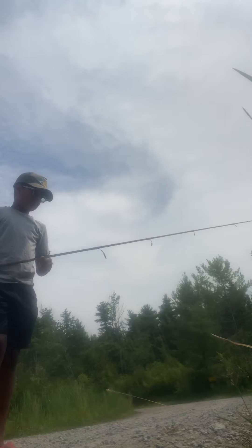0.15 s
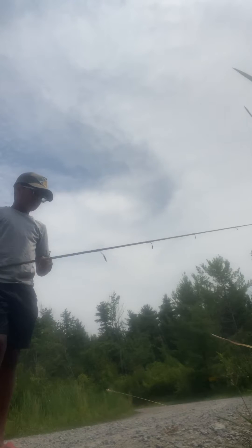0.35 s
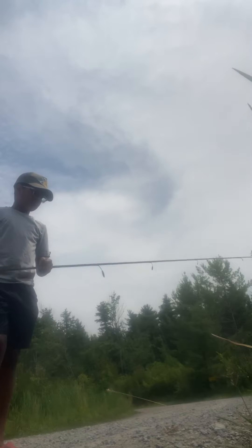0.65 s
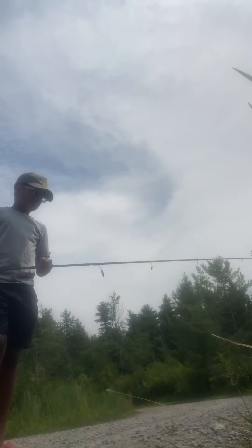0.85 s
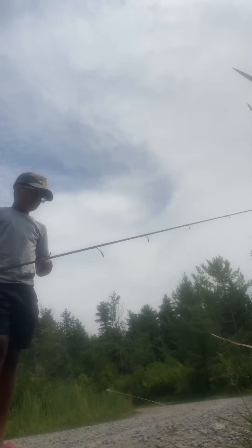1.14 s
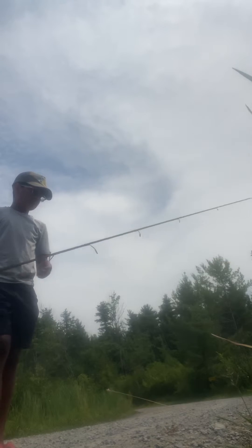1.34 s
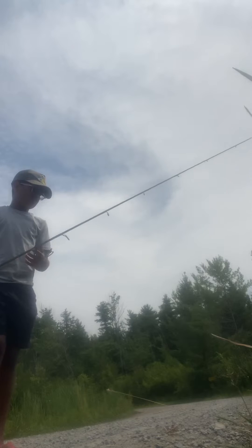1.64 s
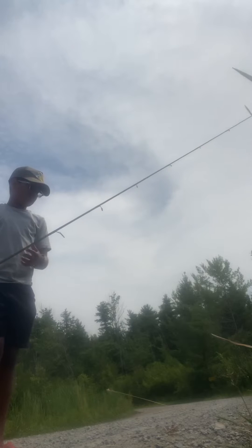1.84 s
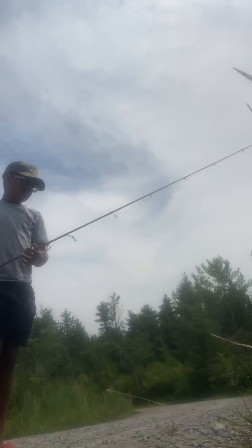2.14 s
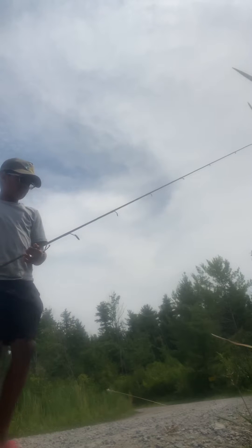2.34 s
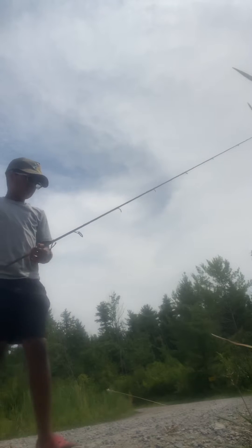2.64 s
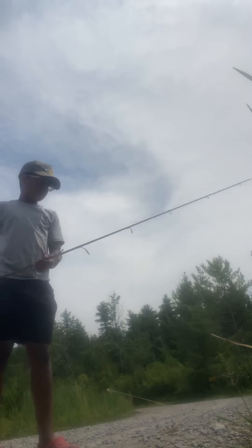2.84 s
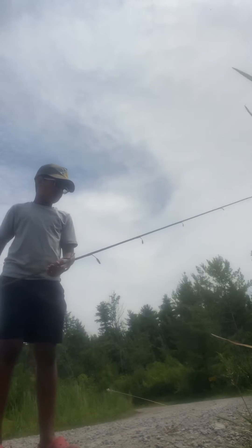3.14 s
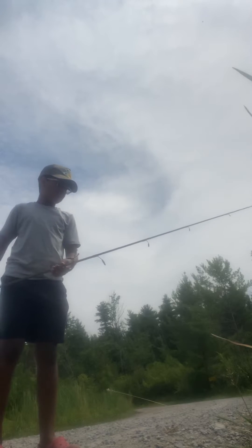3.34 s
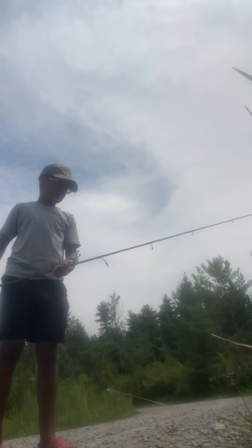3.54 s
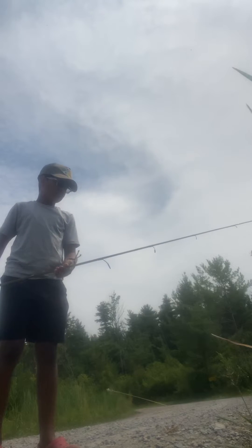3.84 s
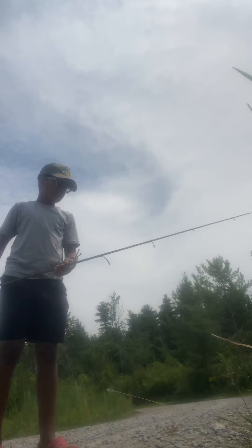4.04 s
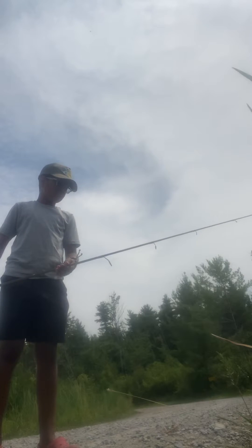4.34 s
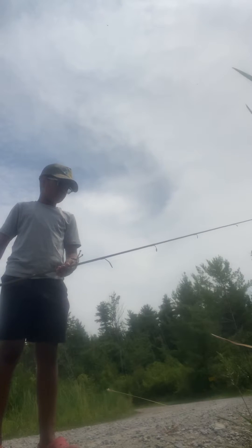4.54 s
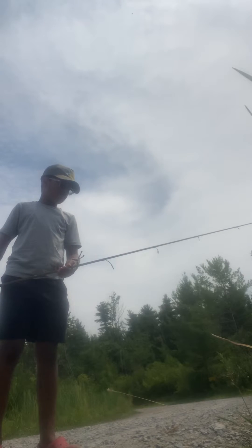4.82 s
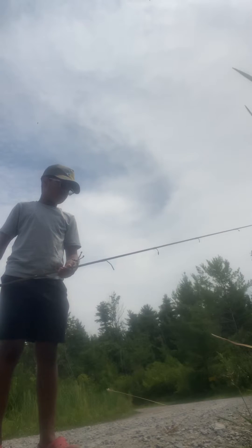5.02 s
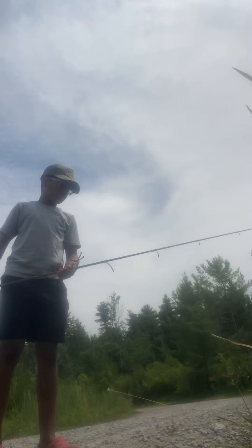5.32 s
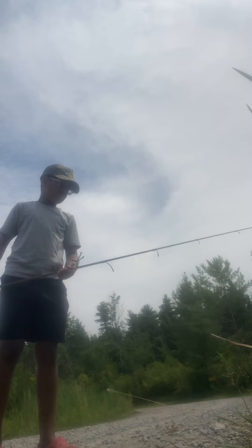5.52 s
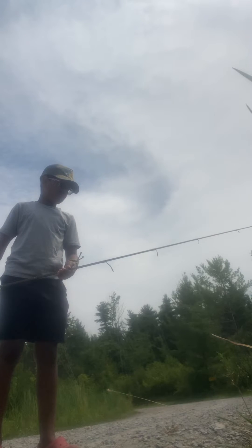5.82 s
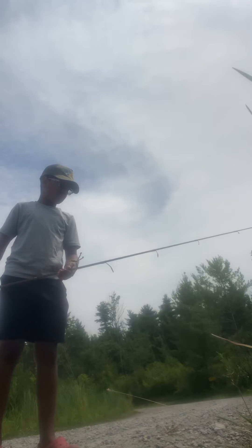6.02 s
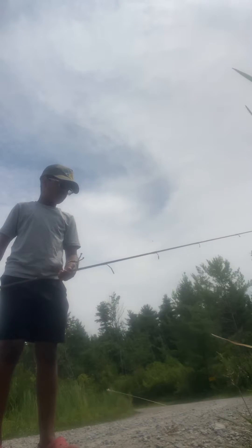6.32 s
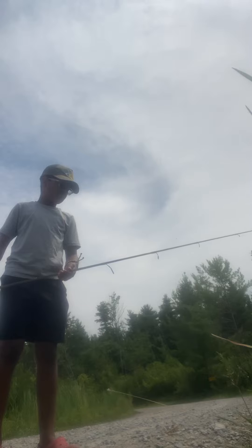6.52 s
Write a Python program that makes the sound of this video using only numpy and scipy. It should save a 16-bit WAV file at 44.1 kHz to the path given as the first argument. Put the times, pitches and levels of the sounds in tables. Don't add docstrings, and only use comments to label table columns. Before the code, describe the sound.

Outdoors by a gravel road, a low engine drone swells nearer as reel snaps, hollow rod knocks, foot scuffs and brief birdsong pass.

```python
import sys
import numpy as np
from scipy import signal
from scipy.fft import rfft, irfft, next_fast_len
from scipy.io import wavfile
from scipy.ndimage import uniform_filter1d

SR = 44100
rng = np.random.default_rng(int(sys.argv[2]) if len(sys.argv) > 2 else 0)


def field_ratio(decibels):
    return 10 ** (np.asarray(decibels, dtype=float) / 20)


def pcm_store(signal):
    levels = np.round(np.clip(np.atleast_2d(signal), -1, 1) * 32767)
    wavfile.write(sys.argv[1], SR, levels.astype(np.int16).T)


N = 294147
T = np.arange(N) / SR

# freq_hz, level_db
WHINE_TONES = [(11897, -106), (12102, -108)]

# freq_hz, density_db
RUMBLE_SPECTRUM = [(18, -43), (30, -28), (42, -7.5), (70, 0), (110, -0.5), (160, -6), (250, -10), (340, -9),
                   (420, -11), (520, -22.5), (800, -45.5), (1500, -90)]
ROAR_SPECTRUM = [(120, -60), (250, -31.5), (450, -1), (550, -1), (680, 0), (800, -6.5), (950, -7.5),
                 (1100, -21), (1600, -28.5), (2600, -49), (5000, -78)]
TREAD_SPECTRUM = [(500, -40.5), (800, 5.5), (1000, -4), (1300, -4.5), (1650, -3), (1900, -14),
                  (2400, -18.5), (3200, -37), (6000, -69)]
AIR_SPECTRUM = [(800, -40), (1900, -11.5), (2400, -10.5), (3300, -14.5), (4200, -11.5), (4900, -17.5),
                (5800, -16), (7500, -17), (9500, -20.5), (11500, -29.5), (12400, -27.5), (14000, -32),
                (20000, -38)]
# close_level_db, closing_share, breeze_share, gust_db
WASH_LAYERS = [
    (-49, .25, 1.2, .4),
    (-63.5, .12, .4, 0.63),
    (-67.5, 0.97, 0.42, 0.8),
    (-85.5, .01, .3, 0.16),
]
# time_s, level_db
BREEZE = [(0, 2.5), (.6, -0.5), (1.15, -0.5), (1.45, 0.5), (2.3, 1), (2.7, 0), (3.1, -2.5), (3.65, -2),
          (4.2, .5), (4.5, 1.5), (4.95, -1.5), (5.6, 1.5), (6.0, -.5), (6.4, 0), (6.67, -0.5)]
# freq_hz, likeness_0_to_1
PORT_LIKENESS = [(60, 0.96), (200, 1), (400, 0.67), (700, 0.57), (1200, 0.65), (2500, 0.42), (5000, .65),
                 (7000, 0.56), (9000, 0.28), (12000, .1)]
# freq_hz, lead_rad
PORT_LEAD = [(0, 0), (430, 0.04), (690, -1.8), (1120, -2.5), (1550, -0.7), (2330, -2), (3010, -2.5),
             (4050, -5.5), (4570, -2.5), (5680, -2.0), (6370, 1), (8180, -0.3), (11600, -3), (11900, -1.8)]
# freq_hz, left_minus_right_db
PORT_TILT = [(60, 0), (190, 1.66), (350, -3.5), (630, 1.3), (1130, 3.5), (2020, 0.5), (11700, 0)]

# start_s, end_s, freq_hz, width_hz, level_db
HUMS = [
    (-.3, 2.3, 123.5, 2.4, -58),
    (-.3, 0.54, 678.3, 31, -58.5),
    (0, 1.35, 339.7, 45, -55.5),
    (1.6, 2.27, 321.6, 7.1, -55.5),
    (2.1, 3.04, 319.5, 3.6, -54),
    (2.1, 3.0, 641, 3, -67),
    (2.6, 2.9, 122, 16, -48),
    (4.2, 4.65, 469.3, 2.4, -66.5),
    (5.95, 6.5, 282.7, 4.5, -59.5),
]

# start_s, end_s
RATTLES = [(.107, .14), (.437, .49), (.797, .83), (.874, .89), (.962, 1.03), (1.337, 1.53), (1.826, 1.85),
           (2.314, 2.34), (2.507, 2.57), (2.785, 2.85), (2.937, 2.97), (3.276, 3.3), (3.617, 3.65),
           (3.765, 3.84), (4.196, 4.26), (4.557, 4.57), (5.247, 5.29), (5.608, 5.655), (5.958, 6.03),
           (6.347, 6.42), (6.507, 6.52), (6.539, 6.585)]

# start_s, length_s, start_hz, end_hz, peak_db
SLIDES = [
    (3.975, 0.25, 3186, 1850, -62.5),
]
# start_s, length_s, pitch_hz, peak_db
PEEPS = [
    (3.345, .05, 4620, -83),
    (3.565, .04, 4280, -80.5),
    (3.676, .075, 4400, -73),
]
# start_s, length_s, end_hz, peak_db
CHIPS = [
    (4.822, .125, 5590, -67.5),
    (4.946, .125, 5430, -67),
    (5.077, 0.1, 5410, -64),
]
# start_s, end_s, start_hz, end_hz, level_db
CHURRS = [
    (4.819, 4.9, 5150, 4900, -59.5),
    (4.923, 5.01, 5050, 5300, -64.5),
    (4.838, 4.9, 4450, 4250, -73),
    (4.916, 5.02, 4100, 4250, -69.5),
    (4.866, 5.0, 3500, 3200, -75),
]
# start_s, end_s, start_hz, end_hz, level_db
BUZZES = [
    (1.862, 1.992, 4120, 4050, -71.5),
    (1.862, 1.985, 5160, 5050, -74),
    (1.23, 1.29, 4550, 4450, -87),
    (1.31, 1.45, 4450, 4200, -84),
]

# start_s, end_s, level_db, grains_per_s
SCUFFS = [(2.04, 2.2, -69, 900), (2.15, 2.27, -75, 6000), (2.28, 2.38, -70, 3200),
          (2.645, 2.98, -73.5, 500), (2.655, 2.78, -69.5, 1000), (2.705, 2.735, -69.5, 2400),
          (.22, 0.31, -78.5, 2000), (3.09, 3.33, -81.5, 1500), (1.3, 1.52, -81, 2000),
          (3.7, 3.95, -78.5, 3000), (.01, 0.22, -78, 2700)]
# freq_hz, density_db
GRAVEL_SPECTRUM = [(650, -36), (1100, -7.5), (1310, 0), (1880, -19.5), (2200, -5.5), (2540, -21.5),
                   (4030, -16), (5670, -31), (7750, -24), (12200, -38), (15800, -66), (22000, -120)]

# start_s, peak_db, freq_hz, t60_s
KNOCKS = [(1.7484, -51, 1250, 0.021), (1.7644, -49, 1270, .02), (1.7774, -52.5, 1360, 0.037),
          (2.048, -41.5, 647, 0.065), (2.118, -41, 685, 0.044), (2.142, -49, 937, 0.097),
          (2.147, -33.5, 413, 0.12), (2.159, -34, 392, 0.059), (2.2887, -42.5, 1240, 0.016),
          (2.3024, -46.5, 1270, .025), (2.76, -63.5, 2170, .04), (3.144, -59.5, 2100, .015),
          (3.297, -44, 415, .14), (3.298, -60.5, 2100, .012), (5.768, -38.5, 412, 0.19)]

# start_s, peak_db, low_part_db, top_end_db
SNAPS = [
    (2.0416, -40, -47, -18.5),
    (2.0735, -43.5, -48, -20.5),
    (2.1102, -43, -45, -20),
    (2.1278, -43, -49, -32.5),
    (2.1445, -51.5, -46, -34),
    (2.1501, -50, -46, -30.5),
]
# freq_hz, width_hz, level_db
REEL_MODES = [(641, 95, 0), (931, 38, -7), (1290, 80, -12), (1490, 66, -12), (2100, 160, -16),
              (4080, 190, -17.5), (6195, 57, -11), (6420, 71, -12), (6980, 100, -19)]
# freq_hz, density_db
SNAP_SPECTRUM = [(500, -25), (1000, -3.5), (1900, -11), (2500, 2), (3200, -10), (4200, -3), (5000, -11),
                 (6400, -5.5), (9000, -5.5), (11700, -16.5), (12400, -48.5)]

# time_s, turns_per_s
TRUCK_SPEED = [(0, 10.8), (.25, 11.47), (.5, 12.98), (.64, 13.36), (.9, 13.56), (1.3, 13.66), (1.78, 13.74),
               (1.88, 13.55), (2.0, 12.72), (2.12, 12.4), (2.4, 12.33), (2.6, 12.55), (3.2, 12.62),
               (4.0, 12.84), (5.0, 13.11), (5.8, 13.31), (6.67, 13.48)]
# time_s, level_db
NEARNESS = [(0, -62), (.14, -52), (.33, -49), (1.1, -46), (1.75, -43), (2.0, -44), (2.4, -42), (2.8, -35),
            (3.75, -36.5), (4.25, -33), (4.6, -34.5), (4.8, -32.5), (5.2, -35), (5.58, -31), (5.85, -34),
            (6.2, -34.5), (6.4, -39.5), (6.67, -33)]
# order, close_level_db, nearness_share, closing_share
TRUCK_ORDERS = [(8, -34.5, 0.97, 0.064), (7, -50, 0.96, 0.36), (9, -48.5, 0.69, 0.63), (6, -49.5, 0.27, .8),
                (5, -53, 0.37, .8), (10, -58, .4, 1.1), (11, -53.5, 0.46, 2), (12, -61.5, 0.23, 1.1),
                (4, -64, 0.44, 0.31), (3, -64.5, 0.5, 1)]
FAR_ORDERS = [(3, -53.5, 0.99, 0.2), (9, -57, 0.27, 0.53), (10, -57.5, .3, 0.45), (16, -58, 0.071, 1),
              (2, -61.5, .9, 0.12), (4, -53, .3, 0.36), (12, -68.5, .1, 1), (14, -67, .1, 1),
              (15, -63.5, .1, .7), (17, -66.5, 0.091, 0.86)]


def evened(x):
    return x / np.sqrt(np.mean(x ** 2) + 1e-20)


def read(points, hz):
    f, value = np.transpose(points)
    return np.interp(np.log(hz + 1), np.log(f + 1), value)


def follow(points, t):
    return np.interp(t, *np.transpose(points))


def add(mix, start_s, sound):
    part = mix[round(start_s * SR):][:len(sound)]
    part += sound[:len(part)]


def colour(x, points):
    size = next_fast_len(len(x))
    gain = field_ratio(read(points, np.fft.rfftfreq(size, 1 / SR)))
    return irfft(rfft(x, size) * gain, size)[:len(x)]


def resonate(x, hz, width_hz):
    return signal.lfilter(*signal.iirpeak(hz, hz / abs(width_hz), SR), x)


def drift(top_hz, at_s):
    hz = np.geomspace(top_hz / 10, top_hz, 12)[:, None]
    t = T[::441]
    waves = np.sin(2 * np.pi * (hz * t + rng.random((12, 1)))) / np.sqrt(hz)
    return np.interp(at_s, t, evened(waves.sum(0)))


def roughness(noise, window_samples):
    return evened(signal.oaconvolve(noise, np.hanning(window_samples), "same"))


def closing_db(t):
    closing_db_per_s = 2.0
    return closing_db_per_s * (t - T[-1])


def whine():
    tones = np.zeros(N)
    for hz, db in WHINE_TONES:
        tones += np.sqrt(2) * field_ratio(db + 2.5 * drift(13.0, T)) * np.sin(2 * np.pi * hz * T)
    return (T > 2.68) * tones


def wash(patchy_db=2.0, flicker_db=0.74):
    frames, hz = N // 512 + 5, np.fft.rfftfreq(2048, 1 / SR)
    a, b, c, d, patches = rng.standard_normal((frames, 1025, 5)).T
    patches = evened(uniform_filter1d(uniform_filter1d(patches, 8, 0), 7, 1))
    flicker = evened(uniform_filter1d(rng.standard_normal(frames), 2))
    same = np.clip(read(PORT_LIKENESS, hz), 0, 1)[:, None]
    left = a + 1j * b
    right = same * left + np.sqrt(1 - same ** 2) * (c + 1j * d)
    z = np.array([left, right]) * field_ratio(patchy_db * patches + flicker_db * flicker)
    t = np.arange(frames) * 512 / SR
    spectra = [RUMBLE_SPECTRUM, ROAR_SPECTRUM, TREAD_SPECTRUM, AIR_SPECTRUM]
    power = 0
    for spectrum, (db, close, breeze, gust_db) in zip(spectra, WASH_LAYERS):
        level_db = db + close * closing_db(t) + breeze * follow(BREEZE, t) + gust_db * drift(2.5, t)
        layer = field_ratio(level_db) * evened(field_ratio(read(spectrum, hz)))[:, None]
        power = power + layer ** 2
    overlap_gain = 0.041
    return overlap_gain * signal.istft(z * np.sqrt(power), nperseg=2048, noverlap=1536)[1][:, :N]


def hums():
    out = np.zeros(N)
    for start_s, end_s, hz, width_hz, db in HUMS:
        tone = evened(resonate(resonate(rng.standard_normal(N), hz, width_hz), hz, width_hz))
        fade = np.sin(np.pi * np.clip((T - start_s) / (end_s - start_s), 0, 1)) ** 0.5
        out += field_ratio(db) * tone * fade
    return out


def insect(rattle_db=-78.0, low_db=-4.0):
    tick_start_s, tick_gap_s, tick_db, tick_hz = .0037, .08, -77.5, 7650
    rattle_gap_s = .0092
    ticks, rattles, t = np.zeros(N), np.zeros(N), np.arange(200) / SR
    at = np.arange(tick_start_s, N / SR, tick_gap_s)
    ticks[(at * SR).astype(int)] = field_ratio(tick_db + 1.5 * rng.standard_normal(len(at)))
    for start_s, end_s in RATTLES:
        at = np.arange(start_s, end_s, rattle_gap_s)
        rattles[(at * SR).astype(int)] = field_ratio(rattle_db + 1.8 * rng.standard_normal(size=40)[:len(at)])
    rise = 1.9 * (1 - np.exp(-t / 0.00026))
    modes = np.sin(2 * np.pi * tick_hz * t) + .5 * np.sin(2 * np.pi * 8300 * t)
    click = rise * field_ratio(-60 * t / .006) * modes
    low = rise * field_ratio(low_db - 60 * t / 0.031) * np.sin(2 * np.pi * 2330 * t)
    return signal.oaconvolve(ticks, click)[:N] + signal.oaconvolve(rattles, click + low)[:N]


def whistles():
    slide_bend_per_s, chip_bend_per_s = 1.2, 48
    peep_sag_hz, chip_from_hz = 70, 7100
    calls = [(*row, slide_bend_per_s, .58) for row in SLIDES]
    calls += [(s, length, hz, hz - peep_sag_hz, db, slide_bend_per_s, .35) for s, length, hz, db in PEEPS]
    calls += [(s, length, chip_from_hz, to_hz, db, chip_bend_per_s, .66) for s, length, to_hz, db in CHIPS]
    out = np.zeros(N)
    for start_s, length_s, from_hz, to_hz, db, bend, top in calls:
        t = np.arange(round(length_s * SR)) / SR
        end = np.exp(-bend * length_s)
        fall = (np.exp(-bend * t) - end) / (1 - end)
        shape_db = np.interp(t / length_s, [0, top, .92, 1], [-17, 2, -6.5, -31.0])
        rough = 1 + .42 * roughness(rng.standard_normal(16000), 220)[:len(t)]
        tone = np.sin(2 * np.pi * np.cumsum(to_hz + (from_hz - to_hz) * fall) / SR)
        add(out, start_s, np.sqrt(2) * field_ratio(db + shape_db) * rough * tone)
    return out


def trills():
    # rate_per_s, pulse_s, share of pitch lost in each pulse
    calls = [(*row, 53.5, .0075, 0.14) for row in CHURRS]
    calls += [(*row, 126, .012, 0.056) for row in BUZZES]
    swell_db, swell_s = -7, .045
    blur_per_db, clear_db = .024, -52
    out = np.zeros(N)
    for start_s, end_s, from_hz, to_hz, trill_db, rate, pulse_s, drop in calls:
        breathy = np.clip(blur_per_db * (clear_db - trill_db), 0, 1)
        t = np.arange(round(pulse_s * SR)) / SR
        chance, puffs = rng.standard_normal(size=(40, 3)), rng.standard_normal(size=(40, 900))
        for s, (loud, off, late), puff in zip(np.arange(start_s, end_s, 1 / rate), chance, puffs):
            hz = np.interp(s, [start_s, end_s], [from_hz, to_hz]) * (1 + .014 * off)
            sweep_hz = hz * (1 + drop * (.5 - t / pulse_s))
            shape = np.hanning(len(t)) * (1 - breathy + breathy * roughness(puff, 110)[:len(t)])
            db = trill_db + swell_db * max(1 - (s - start_s) / swell_s, 0) + 11.0 + 1.6 * loud
            pulse = field_ratio(db) * shape * np.sin(2 * np.pi * np.cumsum(sweep_hz) / SR)
            add(out, s + 0.07 * breathy * late / rate, pulse)
    return out


def birds(echo_db=-9.0):
    out = whistles() + trills()
    t = np.arange(9000) / SR
    tail = rng.standard_normal(len(t)) * field_ratio(-60 * t / 0.26) * (t > .012)
    return out + field_ratio(echo_db) * signal.oaconvolve(out, tail / np.linalg.norm(tail))[:N]


def scuffs():
    out = np.zeros(N)
    for start_s, end_s, db, grains_per_s in SCUFFS:
        hit, size, hiss = rng.random(16000), rng.exponential(1, 16000), rng.standard_normal(16000)
        hits = (hit < grains_per_s / SR) * field_ratio(3.2 * np.minimum(size, 3))
        grains = signal.lfilter([1], [1, -.985], hits) * hiss
        part = colour(grains, GRAVEL_SPECTRUM)[:round((end_s - start_s) * SR)]
        swell = signal.windows.tukey(len(part), .35) * np.linspace(1, .55, len(part))
        add(out, start_s, field_ratio(db) * evened(part) * swell)
    return out


def knocks():
    out, t = np.zeros(N), np.arange(8000) / SR
    for start_s, db, hz, t60_s in KNOCKS:
        soft_start = 1 - np.exp(-t * hz * 1.8)
        add(out, start_s, field_ratio(db - 60 * t / t60_s) * np.sin(2 * np.pi * hz * t) * soft_start)
    return out


def reel(ring_db=-15.0):
    rattle_t60_s, crack_t60_s = 0.1, 0.015
    out, t = np.zeros(N), np.arange(6000) / SR
    fade = np.clip(4 - 4 * t / t[-1], 0, 1) ** 2
    for start_s, db, low_db, top_db in SNAPS:
        decay = field_ratio(-60 * t / rattle_t60_s) * .5 + field_ratio(-60 * t / crack_t60_s)
        burst = rng.standard_normal(len(t)) * decay
        rings = np.zeros(len(t))
        for hz, width_hz, mode_db in REEL_MODES:
            if hz > 2000:
                rings += field_ratio(.4 * mode_db) * np.sqrt(300 / width_hz) * resonate(burst, hz, width_hz)
        high = colour(colour(burst, SNAP_SPECTRUM), [(7000, 0), (11000, top_db + 16)])
        high = high / abs(high).max() + field_ratio(ring_db) * rings / abs(rings).max()
        low = resonate(burst, 700, 250) + 0.88 * resonate(burst, 1350, 350)
        add(out, start_s, (field_ratio(db) * high + field_ratio(low_db) * low / abs(low).max()) * fade)
    return out


def engine(speed, orders, lift_db, fading_db, flutter_db, wobble_rad):
    close_db = -35
    lift_s, lift_length_s, lift_full_order = 4.65, .5, 16
    t = T[::21]
    turns = np.cumsum(np.interp(t, T, speed)) * t[1]
    near_db = follow(NEARNESS, t) - close_db
    lift = lift_db * np.exp(-((t - lift_s) / lift_length_s) ** 4)
    out = np.zeros(len(t))
    for k, (order, db, near, close) in enumerate(orders):
        level_db = db + lift * (order / lift_full_order) ** 2 + near * near_db + close * closing_db(t)
        level_db = level_db + (k > 0) * fading_db * drift(2.5, t)
        level_db = level_db + flutter_db * drift(7., t)
        phase = 2 * np.pi * (round(order) * turns + rng.random()) + wobble_rad * drift(5., t)
        out += np.sqrt(2) * field_ratio(level_db) * np.cos(phase)
    return signal.resample_poly(out, 21, 1)[:N]


def traffic():
    truck = engine(follow(TRUCK_SPEED, T), TRUCK_ORDERS,
                   lift_db=-0.5, fading_db=2.2, flutter_db=0.8, wobble_rad=0.13)
    far_start_hz, far_sag_hz_per_s = 21.045, .144
    far = engine(far_start_hz - far_sag_hz_per_s * T, FAR_ORDERS,
                 lift_db=9., fading_db=1.75, flutter_db=2.0, wobble_rad=.25)
    return truck + far


def ports(x, leak=0.54):
    size = next_fast_len(N)
    hz = np.fft.rfftfreq(size, 1 / SR)
    half = field_ratio(read(PORT_TILT, hz) / 2) * np.exp(.5j * follow(PORT_LEAD, hz))
    even = np.hypot(1, leak) / np.hypot(abs(half + 1 / half) / 2, leak)
    return irfft(rfft(x * np.ones((2, 1)), size) * [half * even, even / half], size)[:, :N]


def scene():
    around = wash() + traffic() + hums() + 0.76 * reel() + scuffs() + birds()
    near = field_ratio(np.array([[1.2], [-1.2]])) * knocks() + .7 * reel()
    return ports(around) + near + insect() + whine()


def low_pass(x):
    return signal.sosfilt(signal.butter(12, 12340, fs=SR, output="sos"), x)


def record(dry):
    low_cut = signal.butter(3, 37, "highpass", fs=SR, output="sos")
    mix = signal.sosfilt(low_cut, dry)
    return low_pass(mix)


dry = scene()
out = record(dry)
pcm_store(out)
```